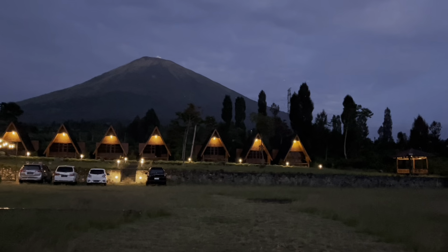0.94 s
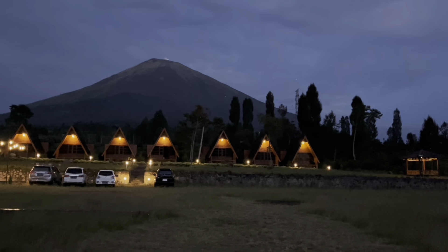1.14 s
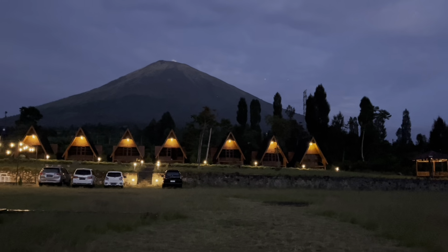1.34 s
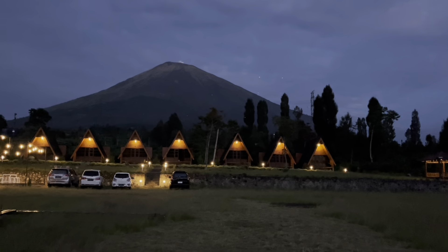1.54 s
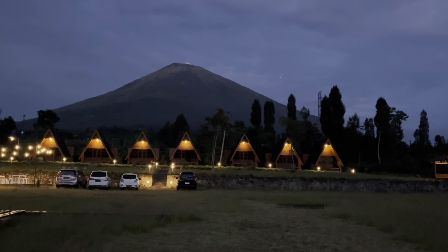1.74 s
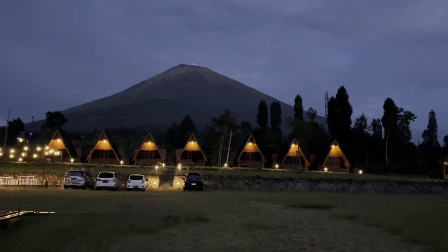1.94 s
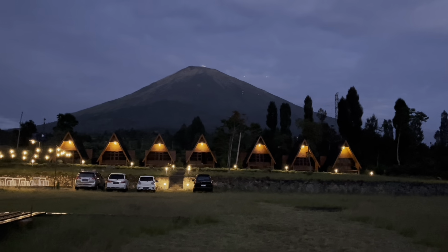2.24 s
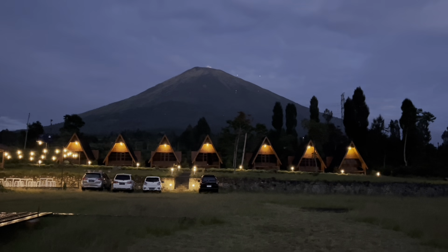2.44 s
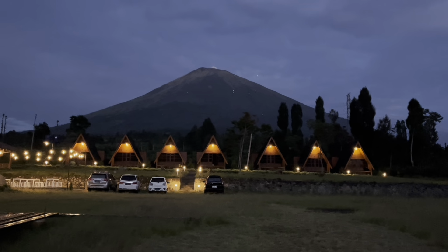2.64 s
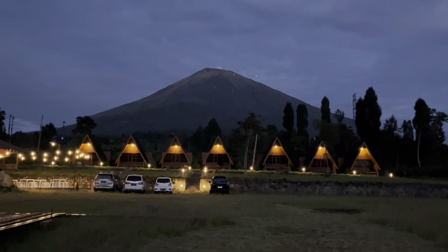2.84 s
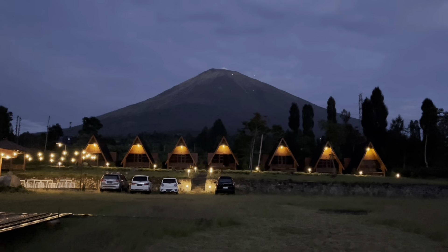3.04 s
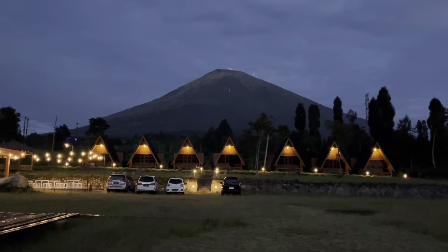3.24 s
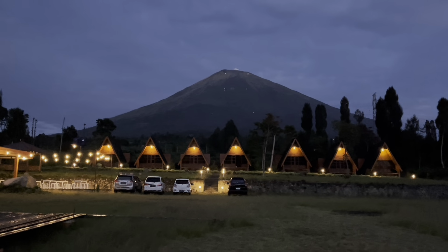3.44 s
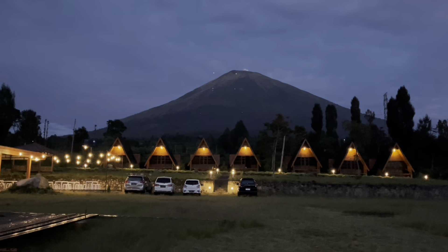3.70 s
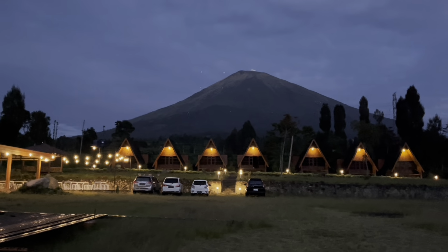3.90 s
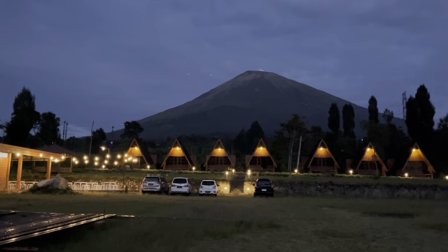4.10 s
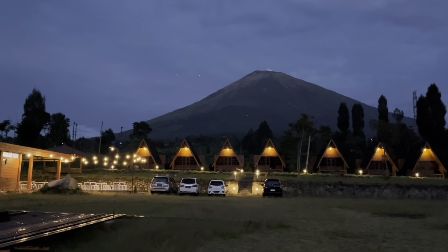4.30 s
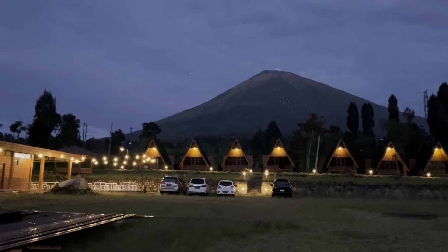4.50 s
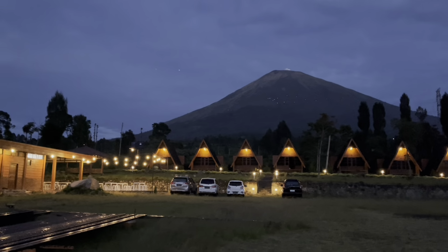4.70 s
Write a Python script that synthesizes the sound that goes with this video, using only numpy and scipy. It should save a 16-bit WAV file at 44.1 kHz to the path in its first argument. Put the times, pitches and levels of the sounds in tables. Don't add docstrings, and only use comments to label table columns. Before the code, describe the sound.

Many small birds whistle, slur and chirp without pause in trees around an open mountain camp, mostly toward the left. A blurred far chorus fills the gaps. Distant traffic throbs low in uneven swells, a stream washes faintly, and a cricket trill stops almost at once. Handheld phone, stereo, with slight echoes from trees and roofs and very faint hiss.

```python
import sys
import numpy as np
from scipy import signal
from scipy.fft import rfft, irfft, next_fast_len
from scipy.io import wavfile
from scipy.ndimage import uniform_filter1d, map_coordinates

SR = 44100
rng = np.random.default_rng(int(sys.argv[2]) if len(sys.argv) > 2 else 0)


def field_ratio(decibels):
    return 10 ** (np.asarray(decibels, dtype=float) / 20)


def wav_record(signal):
    frames = np.transpose(np.atleast_2d(signal))
    bounded = np.clip(frames, -1, 1)
    quanta = np.round(bounded * 32767).astype(np.int16)
    wavfile.write(sys.argv[1], SR, quanta)


N = 214279


def unit(x):
    return x / np.sqrt(np.mean(x ** 2) + 1e-20)


def along(points, hz):
    f, value = np.transpose(points)
    return np.interp(np.log(hz + 1), np.log(f + 1), value)


def curves(rows):
    s, *columns = np.transpose(rows)
    return [np.interp(np.arange(N) / SR, s, column) for column in columns]


def wobble(rate_hz):
    knots = rng.standard_normal(int(N * 2000 / SR) + 4)
    return map_coordinates(knots, [np.arange(N) * min(rate_hz, 2000) / SR])


def filtered(x, response):
    m = next_fast_len(N + SR // 2)
    return irfft(rfft(x, m) * response(np.fft.rfftfreq(m, 1 / SR)), m)[..., :N]


# (f/Hz, correlation)
PORT_LIKENESS = [(60, .62), (300, .64), (1000, .5), (2500, .42), (5500, .15), (8000, .78), (12000, .9)]
# (f/Hz, phase/rad)
PORT_LEAD = [(0, .3), (250, .9), (3000, 7.7), (4550, 7.2), (7000, 10.6), (7700, 15.7), (8900, 15.7),
             (9600, 14.7), (11000, 12.6)]


def rush(spectrum, patchy_db, pan_db):
    z = signal.stft(rng.standard_normal((2, N + 512)), nperseg=512)[2]
    patches = uniform_filter1d(rng.standard_normal(z.shape[1:]), size=4, axis=0)
    patches = uniform_filter1d(patches, size=8, axis=1)
    pair = signal.istft(z * field_ratio(patchy_db * unit(patches)), nperseg=512)[1][:, :N]

    def mid_side(hz):
        turn = np.arccos(np.clip(along(PORT_LIKENESS, hz), -1, 1)) / 2
        return field_ratio(along(spectrum, hz)) * [np.cos(turn), np.sin(turn)]

    def lead(hz):
        return np.exp(.5j * np.outer([1, -1], np.interp(hz, *np.transpose(PORT_LEAD))))

    mid, side = filtered(pair, mid_side)
    ports = filtered(np.array([mid + side, mid - side]), lead)
    return unit(ports) * field_ratio([[pan_db / 2], [-pan_db / 2]])


# (delay t/s, level/dB against the scattered tail)
ROOFS = [
    (.013, -1),
    (.024, -3),
]


def placed(x, pan_db, lead_s, wet_db, t60):
    def ports(hz):
        delay = np.exp(-1j * np.pi * np.outer([-lead_s, lead_s], hz))
        return field_ratio([[pan_db / 2], [-pan_db / 2]]) * delay

    t = np.arange(SR // 3) / SR
    tail = rng.standard_normal((2, len(t))) * field_ratio(-60 * t / t60) * (1 - np.exp(-t / 0.022))
    polarity = np.sign(rng.standard_normal((2, len(ROOFS))))
    for k, (s, db) in enumerate(ROOFS):
        tail[:, round(s * SR)] += field_ratio(db) * polarity[:, k] * np.linalg.norm(tail[0])
    echoes = signal.fftconvolve(x[None], tail / np.linalg.norm(tail[0]), axes=1)[:, :N]
    return filtered(x, ports) + field_ratio(wet_db) * echoes


def voice(notes, round_off, flutter_db, warble_hz, trill_hz=0, beads_depth=.6):
    out, rasp = np.zeros(N + SR), wobble(170)
    swing = np.sin(2 * np.pi * np.cumsum(trill_hz * (1 + .4 * wobble(90))) / SR)
    for s, length, a, b, c, db in notes:
        u = np.linspace(0, 1, max(round((length + .004) * SR), 8))
        at = round(s * SR)
        now = (at + np.arange(len(u))) % N
        if trill_hz:
            hz = a + (b - a) * u + c * swing[now]
        else:
            hz = a + (4 * b - 3 * a - c) * u + 2 * (a - 2 * b + c) * u ** 2
        upper = np.clip((hz - 2400) / 900, .1, 1)
        hz = hz + warble_hz * upper * rasp[now]
        pulse = np.cos(np.pi * 55 * np.arange(len(u)) / SR) ** 2
        beads = 1 - beads_depth * upper * (trill_hz == 0) * pulse
        phase = 2 * np.pi * np.cumsum(hz) / SR
        tone = np.sin(phase) + field_ratio(-48) * np.sin(2 * phase)
        tone += field_ratio(-57) * (hz < 4600) * np.sin(3 * phase)
        swell = np.abs(np.sin(np.pi * u)) ** round_off
        out[at:at + len(u)] += field_ratio(db) * swell * beads * tone
    breath = np.clip(wobble(130), -3, 1.2)
    return out[:N] * field_ratio(flutter_db * breath)


def held(rows):
    return [(s, length, hz, hz, hz, db) for s, length, hz, db in rows]


def slurs(rows):
    late = 0.14
    return [(s, length, hz - (.5 - late) * glide, hz, hz + (.5 + late) * glide, db)
            for s, length, hz, glide, db in rows]


# (f/Hz, level/dB per Hz)
HISS_SPECTRUM = [(5000, -120), (6000, -3), (8500, -11.5), (9400, -1.5), (12900, -9.5), (13500, -13),
                 (14500, -120)]


def hiss():
    return field_ratio(-80.5) * rush(HISS_SPECTRUM, patchy_db=1.8, pan_db=-1.0)


# (f/Hz, level/dB per Hz)
RUMBLE_SPECTRUM = [(16, -42.5), (28, -12), (47, 0.5), (64, 5.5), (80, 2.5), (115, -9), (150, -35),
                   (250, -120)]
# (t/s, level/dB over the lull)
TRAFFIC_SWELLS = [
    (0.018, 8.5),
    (0.331, 10),
    (.57, 4),
    (0.869, 7),
    (1.417, 10.5),
    (2.251, 12),
    (2.54, 12),
    (3.3, 2.5),
    (3.87, 7),
    (4.66, 4.5),
]


def traffic():
    lull_db, rise_s, fall_s = -29.5, 0.063, 0.033
    s, db = np.transpose(TRAFFIC_SWELLS)[:, :, None]
    late = np.arange(N) / SR - s
    swell_db = (db * np.exp(-np.abs(late) / np.where(late < 0, rise_s, fall_s))).max(0)
    rumble = rush(RUMBLE_SPECTRUM, patchy_db=2.0, pan_db=-0.5)
    power = uniform_filter1d(rumble.mean(0) ** 2, size=3500)
    rumble = unit(rumble / np.abs(power + 0.072) ** 0.26)
    return field_ratio(lull_db + swell_db) * rumble


# (f/Hz, level/dB per Hz)
DRONE_SPECTRUM = [(62, -30.5), (105, -3), (142, 1), (188, -11), (240, -26), (310, -47.5), (530, -120)]
# (t/s, level/dB)
DRONE_LEVEL = [
    (0.0, -40),
    (2.35, -40.5),
    (4.86, -43.5),
]


def truck_drone():
    return field_ratio(curves(DRONE_LEVEL)[0] + 4.0) * rush(DRONE_SPECTRUM, patchy_db=0.0, pan_db=-2.0)


# (f/Hz, level/dB per Hz)
STREAM_SPECTRUM = [(130, -33), (220, -3), (383, -3.5), (559, -13), (955, -11), (1680, -20.5), (2600, -23.5),
                   (4400, -120)]
# (t/s, level/dB)
STREAM_LEVEL = [
    (0.0, -51),
    (1.8, -47),
    (4.86, -47),
]


def stream():
    return field_ratio(curves(STREAM_LEVEL)[0] + 4.5) * rush(STREAM_SPECTRUM, patchy_db=2.0, pan_db=-.7)


def chatter(spectrum, low_hz, high_hz, lead_s, count):
    stands = []
    for pan_db in (4.5, 1):
        p, z = rng.random((count, 2)), rng.standard_normal((count, 4))
        start_s, length_s = p[:, 0] * N / SR, .021 * np.exp(.45 * z[:, 1])
        hz = low_hz + (high_hz - low_hz) * p[:, 1]
        slur = hz * 0.05 * z[:, 0] - 70
        notes = np.c_[start_s, length_s, hz - slur, hz + 60 * z[:, 2], hz + slur, 2.5 * z[:, 3]]
        birds = voice(notes, round_off=.8, flutter_db=3.5, warble_hz=60)
        stands.append(placed(birds, pan_db=pan_db, lead_s=lead_s, wet_db=-2, t60=.5))
    return unit(filtered(sum(stands), lambda hz: field_ratio(along(spectrum, hz))))


# (f/Hz, level/dB per Hz)
CHORUS_SPECTRUM = [(1300, -58), (1950, -16), (2220, -7.5), (2480, -6.5), (3400, -6), (3700, -22.5),
                   (4940, -55), (8360, -120)]
# (t/s, level/dB)
CHORUS_LEVEL = [(0, -44.5), (.45, -47.5), (.7, -46.5), (1.08, -49), (1.4, -45.5), (1.85, -45), (2.2, -49),
                (2.87, -48), (3.3, -47.5), (3.6, -47.5), (4.2, -48), (4.86, -46)]


def far_chorus():
    near = chatter(CHORUS_SPECTRUM, 2250, 3450, lead_s=.00041, count=330)
    blur = rush(CHORUS_SPECTRUM, patchy_db=3.2, pan_db=3)
    return field_ratio(curves(CHORUS_LEVEL)[0]) * (field_ratio(-2.2) * near + field_ratio(-5) * blur)


# (f/Hz, level/dB per Hz)
FLOCK_SPECTRUM = [(3000, -43), (3600, -11), (4000, -18), (4500, -21), (5200, -21.5), (5800, -28.5),
                  (7000, -40.5), (9000, -120)]
# (t/s, level/dB)
FLOCK_LEVEL = [
    (0, -66),
    (.9, -70),
    (1.35, -65),
    (2, -68.5),
    (2.9, -69.5),
    (3.4, -65),
    (4.1, -68.5),
    (4.86, -66.5),
]


def high_flock():
    higher = chatter(FLOCK_SPECTRUM, 3600, 5000, lead_s=.00027, count=90)
    haze = rush(FLOCK_SPECTRUM, patchy_db=2.2, pan_db=5)
    return field_ratio(curves(FLOCK_LEVEL)[0]) * (field_ratio(-1) * higher + field_ratio(3.5) * haze)


def cricket():
    t = np.arange(N) / SR
    stops = np.clip((.31 - t) / .03, 0, 1)
    strokes = np.abs(np.sin(np.pi * 58 * t)) * stops
    ring = np.sin(2 * np.pi * np.cumsum(5080 + 45 * wobble(200)) / SR)
    trill = field_ratio(-64.5 + 2 * wobble(40)) * strokes * ring
    return placed(trill, pan_db=8, lead_s=0.00043, wet_db=-9, t60=.1)


# (t/s, peak level/dB, top-end level/dB)
TWIGS = [
    (0.2335, -64, -25),
    (1.171, -49, -30),
    (3.444, -60.5, -25.5),
    (3.72, -74.5, 9),
    (2.505, -75, 1),
    (2.615, -75.5, 7.5),
    (3.335, -77, 4),
    (1.815, -78, 4.5),
]


def twigs():
    low, top, t = np.zeros(N), np.zeros(N), np.arange(400) / SR
    for s, db, top_db in TWIGS:
        at = slice(round(s * SR), round(s * SR) + len(t))
        low[at] += field_ratio(db + 2.0 - 60 * t / .0045) * rng.standard_normal(len(t))
        top[at] += field_ratio(db + top_db + 5.5 - 60 * t / .012) * rng.standard_normal(len(t))
    crackle = filtered(low, lambda hz: (hz > 3800) / (1 + (hz / 6500) ** 10))
    bright = filtered(top, lambda hz: (hz > 9500) & (hz < 14000))
    return placed(crackle + bright, pan_db=.5, lead_s=0, wet_db=-9, t60=.1)


CHIP_LEVELS = [
    -64,
    -56,
    -56,
    -57,
    -55.5,
    -55.5,
]


def chip_series():
    start_s, gap_s, length_s = 1.107, .0714, .029
    return [(start_s + k * gap_s, length_s, 4680, 4480, 4080, db) for k, db in enumerate(CHIP_LEVELS)]


# (t/s, length t/s, middle f/Hz, glide f/Hz,
# peak level/dB)
CLEAR_WHISTLES = [(.68, .045, 2270, -1, -50), (1.105, 0.088, 2550, 90, -47.5),
                  (1.118, 0.022, 2980, -330, -39), (1.625, .045, 2400, -500, -43.5),
                  (1.978, .036, 3100, -130, -34), (2.05, 0.015, 3060, -120, -47.5),
                  (2.066, .046, 2940, -87, -34.5), (2.19, 0.027, 3050, 258, -35.5),
                  (2.228, 0.029, 3170, 0, -41.5), (2.266, 0.022, 3030, 241, -38),
                  (2.288, .032, 3180, 29, -34), (2.324, 0.024, 3030, -260, -40),
                  (2.28, .05, 2550, -170, -47.5), (2.208, .046, 2590, -190, -36.5),
                  (2.248, .04, 2400, -360, -40.5), (2.486, .016, 3170, -85, -40),
                  (2.9, 0.02, 2830, -220, -36.5), (2.928, 0.028, 2780, -230, -41),
                  (3.412, 0.022, 2640, -120, -42.5), (3.727, .022, 2500, -150, -33),
                  (3.29, .06, 2780, -20, -45), (1.865, .028, 3200, -50, -44), (3.99, .03, 2700, 30, -44),
                  (4.158, 0.032, 2620, 2, -49), (4.188, 0.028, 2830, 112.5, -48),
                  (4.365, .022, 2640, -200, -41.5), (2.68, 0.27, 508, 2, -48.5),
                  (1.553, 0.025, 6200, 0, -59), (1.772, .016, 7400, 3, -70), (1.435, .018, 6250, 50, -64)]


def clear_whistlers():
    song = voice(slurs(CLEAR_WHISTLES) + chip_series(),
                 round_off=.5, flutter_db=1.2, warble_hz=12, beads_depth=.15)
    return placed(song, pan_db=2, lead_s=.00041, wet_db=-9, t60=.3)


# (t/s, length t/s, middle f/Hz, glide f/Hz, peak level/dB)
CHIRPS = [(.335, 0.02, 3700, 298, -38), (.355, .022, 3450, -200, -43), (.355, 0.03, 2750, 146, -43),
          (.415, 0.016, 3790, 296, -42), (.65, 0.017, 3700, -300, -34), (.695, 0.045, 3740, 198, -45),
          (.702, 0.017, 3010, -100, -42), (.718, 0.028, 3400, -350, -32.5), (1.075, 0.02, 2610, -250, -47),
          (1.07, 0.036, 2140, 38, -52), (1.098, .016, 3950, -84, -53), (1.236, .012, 3290, 100, -40),
          (1.256, 0.019, 3150, 79, -42), (1.312, .016, 3420, -150, -44.5), (1.35, 0.019, 2760, 0, -44),
          (1.568, 0.018, 2335, 52, -47), (1.594, .016, 3080, -100, -38), (1.63, .014, 2940, 57.5, -42.5),
          (1.708, 0.021, 2456, 153, -37), (1.945, 0.014, 2470, 254, -39.5), (3.076, 0.014, 2550, -100, -49),
          (3.155, .016, 3880, -1, -47), (3.218, .012, 2830, -100, -43), (3.238, 0.04, 3120, 221, -41.5),
          (3.37, .022, 3340, -79, -48), (3.465, 0.013, 3200, 100, -39), (3.545, .012, 3175, -3, -51),
          (3.555, .014, 2570, -100, -44), (3.572, 0.034, 2920, -170, -45.5), (3.57, .018, 4580, -100, -61),
          (3.79, 0.018, 3660, -100, -51), (3.905, 0.02, 2550, 2, -46), (3.942, 0.018, 2470, -200, -41),
          (4.022, .018, 3400, 1, -55), (4.088, .016, 2883, -61, -41), (4.255, .018, 2370, -62, -47.5),
          (4.28, 0.031, 2940, -370, -42.5), (4.326, .018, 2350, -78, -44), (4.376, .016, 3580, 61.5, -41.5),
          (.012, .014, 3150, 300, -42), (.034, .016, 2900, 699, -42), (.048, .016, 3600, -500, -43),
                  (.41, .018, 2880, -100, -41), (.805, .022, 3330, 1, -45), (1.765, .018, 3930, -80, -44),
                  (4.548, .018, 3500, 500, -46), (4.678, .022, 3520, -120, -45),
                  (4.703, .024, 3050, -300, -43), (4.775, .02, 3680, -80, -50),
                  (3.997, .016, 3950, -50, -53), (4.455, .025, 2080, -300, -50),
                  (3.29, .02, 3350, -250, -46), (1.6, .02, 2900, -200, -40.5),
                  (1.835, .025, 2580, -250, -44), (1.7, 0.023, 3230, -100, -45),
                  (3.7, 0.02, 2850, 250, -40), (2.395, .016, 2000, -200, -50), (.45, .022, 3550, -150, -44),
                  (.568, .012, 3050, -250, -38), (.73, .014, 3150, 150, -38), (1.955, .018, 3820, 150, -52),
                  (2.862, .022, 3250, 300, -45), (4.05, .05, 2980, -60, -45), (4.375, .02, 4500, 50, -53),
                  (4.818, .016, 4420, -50, -60)]


def chirpers():
    song = voice(slurs(CHIRPS), round_off=.6, flutter_db=2.4, warble_hz=40)
    return placed(song, pan_db=3, lead_s=.00041, wet_db=-6, t60=.3)


# (t/s, length t/s, start f/Hz)
RISES = [
    (.52, .22, 2100),
    (1.3, .26, 2090),
    (2.09, .33, 1960),
    (2.66, .13, 2130),
    (2.91, .3, 1970),
    (3.72, .27, 1980),
    (4.4, .12, 2000),
]


def rising_whistler():
    hz_per_s, level_db = 680, -52.5
    return [(s, length, hz, hz + hz_per_s * length / 2, hz + hz_per_s * length, level_db)
            for s, length, hz in RISES]


# (t/s, middle f/Hz, peak level/dB)
HOOKS = [
    (.118, 2240, -35.5),
    (.9, 2280, -36.5),
    (1.673, 2330, -39.5),
    (2.443, 2330, -36),
    (2.92, 2374, -37),
    (3.326, 2340, -37),
]


def hook_singer():
    length_s, drop_hz, settle_hz = .048, 210, 90
    return [(s, length_s, hz + drop_hz, hz, hz - settle_hz, db) for s, hz, db in HOOKS]


# (t/s, length t/s, middle f/Hz, glide f/Hz,
# peak level/dB)
SOFT_SLURS = [(.088, 0.0086, 3290, -550, -41.5), (.27, 0.047, 2636, 118, -43.5),
              (.33, 0.022, 7050, -800, -68.5), (.43, .03, 9500, -300, -69),
              (.468, 0.025, 9400, -500, -67.5), (.53, 0.012, 1735, -400, -49),
              (.762, 0.022, 3050, -550, -36), (.822, 0.035, 2950, -800, -47), (1, 0.047, 3330, -620, -48),
              (1.415, .03, 3230, -200, -32.5), (1.445, 0.022, 3910, 347, -38.5),
              (1.752, 0.021, 3490, 848, -36.5), (1.762, 0.039, 3213, -500, -29.5),
              (1.78, 0.011, 1894, -200, -46.5), (3.21, 0.014, 3070, -700, -47),
              (3.85, 0.14, 2560, 109, -49), (4.455, 0.026, 2720, 145, -41.5),
              (4.512, 0.012, 3440, -1100, -35.5), (4.615, 0.013, 2815, -400, -36)]


def soft_singers():
    song = voice(slurs(SOFT_SLURS) + hook_singer() + rising_whistler(),
                 round_off=.45, flutter_db=2.4, warble_hz=30)
    return placed(song, pan_db=3, lead_s=.00041, wet_db=-8, t60=.3)


# (t/s, length t/s, start f/Hz, end f/Hz, peak level/dB)
BUZZES = [(.235, .035, 4200, 4400, -59), (.33, .07, 3700, 3500, -47), (.625, .137, 4180, 4150, -49.5),
          (3.265, .035, 3900, 4200, -55), (3.53, .022, 3300, 3900, -48), (1.23, .04, 3300, 4000, -51),
          (1.605, .03, 3900, 3500, -50), (1.31, .035, 3900, 4000, -53), (1.755, .06, 3500, 3200, -48),
          (3.35, .025, 3900, 4500, -54), (3.435, .014, 4600, 4800, -56), (3.452, .03, 3900, 3700, -54),
          (3.83, .07, 4200, 3800, -60), (4.24, .065, 3600, 3950, -51), (4.268, .058, 4330, 4420, -57),
          (4.355, .035, 3700, 4100, -53), (3.13, .085, 3600, 4000, -56), (4.468, .03, 3900, 3700, -54),
          (4.545, .02, 3500, 4000, -52)]


def buzzers():
    swing_hz = 210
    notes = [(s, length, start, end, swing_hz, db) for s, length, start, end, db in BUZZES]
    song = voice(notes, round_off=.25, flutter_db=1.5, warble_hz=45, trill_hz=190)
    return placed(song, pan_db=6, lead_s=.00026, wet_db=-9, t60=.1)


# (t/s, length t/s, middle f/Hz, glide f/Hz, peak level/dB)
BEHIND_SLURS = [(.305, 0.044, 3235, 274, -34), (.405, 0.054, 2934, 126, -38.5),
                (.419, 0.046, 3304, -400, -37), (.485, 0.049, 2800, -650, -34),
                (.782, 0.027, 3350, -170, -40.5), (1.149, .034, 3090, -300, -31),
                (1.347, 0.035, 3270, -320, -33), (1.491, 0.036, 3390, -320, -41.5),
                (1.54, 0.031, 3240, -460, -40), (2.331, 0.033, 2904, -120, -37),
                (2.363, 0.027, 2660, -300, -34.5), (2.482, .028, 2610, -370, -39),
                (2.562, .069, 2583, -290, -35.5), (3.624, .051, 2747, 235, -36.5),
                (4.775, .02, 2340, -795, -39.5)]
# (t/s, length t/s, middle f/Hz, arch f/Hz, peak level/dB)
ARCHES = [
    (0.05, 0.088, 4100, 119, -58.5),
    (0.837, .039, 2500, -165, -37.5),
    (1.132, 0.019, 3400, -210, -37),
    (1.384, 0.028, 3850, 124, -42),
    (2.522, .058, 2820, 256, -38),
    (2.796, 0.095, 2715, -200, -45),
    (3.401, 0.021, 2760, 248, -37.5),
    (4.606, 0.037, 3800, 297, -48.5),
]


def birds_behind():
    arches = [(s, length, hz - arch, hz, hz - arch, db) for s, length, hz, arch, db in ARCHES]
    song = voice(slurs(BEHIND_SLURS) + arches, round_off=.6, flutter_db=3.2, warble_hz=55)
    return placed(song, pan_db=5.5, lead_s=.00025, wet_db=-7, t60=.3)


# (t/s, length t/s, middle f/Hz, glide f/Hz, peak level/dB)
LEFT_SLURS = [(1.303, 0.053, 3060, -180, -44), (1.604, 0.065, 2860, 351, -47),
              (1.756, 0.053, 3670, -540, -38.5), (2.281, .052, 1980, -220, -51.5),
              (2.632, 0.02, 1780, -510, -41.5), (2.644, 0.0088, 4730, -83, -50),
              (2.482, .028, 3950, -800, -51), (2.822, .046, 2450, 800, -38), (3.023, .04, 3100, -370, -38),
              (3.275, 0.02, 3325, -200, -41), (3.618, .034, 3320, -240, -42),
              (3.768, 0.022, 3176, -500, -34), (3.795, 0.02, 2977, -300, -31.5),
              (3.881, 0.023, 2920, -170, -36.5), (3.899, .038, 3070, -470, -36.5),
              (4.648, .02, 3395, -280, -33.5)]
# (t/s, length t/s, f/Hz, peak level/dB)
LEFT_WHISTLES = [(.453, 0.056, 3240, -33), (.94, 0.011, 3380, -42.5), (1.287, 0.064, 2327, -43),
                 (1.385, 0.021, 3084, -35.5), (1.562, 0.09, 2773, -39.5), (1.672, 0.04, 3070, -39),
                 (1.882, 0.11, 2310, -42.5), (3.001, 0.017, 3350, -38), (3.219, 0.065, 2794, -45),
                 (4.003, 0.046, 3000, -43), (3.684, 0.05, 2750, -41), (3.73, 0.081, 2680, -42),
                 (3.811, 0.029, 2320, -47)]


def birds_left():
    song = voice(slurs(LEFT_SLURS) + held(LEFT_WHISTLES), round_off=.6, flutter_db=2.8, warble_hz=40)
    return placed(song, pan_db=6, lead_s=.00036, wet_db=-7, t60=.3)


# (t/s, length t/s, middle f/Hz, glide f/Hz, peak level/dB)
AHEAD_SLURS = [(0, 0.025, 2874, -200, -33.5), (.046, 0.035, 2950, -800, -36.5), (.15, 0.021, 3050, 96, -38),
               (.313, 0.032, 2685, -140, -38.5), (.569, 0.034, 2760, -630, -38),
               (1.614, 0.02, 2175, -120, -41), (2.035, 0.077, 2520, 101, -42.5),
               (2.176, 0.029, 2470, 182, -39.5), (2.403, 0.035, 3020, -490, -35.5),
               (2.672, 0.033, 2525, -150, -41), (3.424, .032, 2850, 750, -35),
               (3.444, 0.028, 2480, -590, -42), (3.518, .02, 3210, 292, -34),
               (4.453, 0.023, 3050, 694, -30.5), (4.526, .04, 2900, 330.5, -28.5),
               (4.582, 0.045, 2580, 391, -36), (4.575, 0.034, 3170, -300, -29),
               (4.634, 0.02, 2476, -500, -38.5)]
# (t/s, length t/s, f/Hz, peak level/dB)
AHEAD_WHISTLES = [(.066, 0.048, 2453, -42.5), (.108, 0.026, 2750, -39.5), (.385, 0.016, 2925, -34.5),
                  (.385, 0.044, 3160, -33.5), (.519, 0.045, 3127, -28), (.746, 0.066, 3060, -42.5),
                  (2.883, 0.05, 2464, -38.5), (4.385, 0.034, 2510, -43), (4.478, .018, 3275, -30.5),
                  (.234, 0.012, 2700, -36), (4.645, 0.11, 2680, -40), (4.795, 0.028, 2650, -39)]


def birds_ahead():
    song = voice(slurs(AHEAD_SLURS) + held(AHEAD_WHISTLES), round_off=.6, flutter_db=3.2, warble_hz=55)
    return placed(song, pan_db=.6, lead_s=.00041, wet_db=-7, t60=.3)


def scene():
    valley = traffic() + truck_drone() + stream()
    crowd = far_chorus() + high_flock()
    middle_distance = clear_whistlers() + chirpers()
    singers = soft_singers() + buzzers() + birds_behind() + birds_left() + birds_ahead()
    return valley + crowd + cricket() + twigs() + middle_distance + singers


def low_pass(x):
    return signal.sosfilt(signal.butter(12, 13900, fs=SR, output="sos"), x)


def record(dry):
    heard = filtered(dry, lambda hz: (1j * hz / (38 + 1j * hz)) ** 2)
    return low_pass(heard + hiss())


dry = scene()
out = record(dry)
wav_record(out)
```